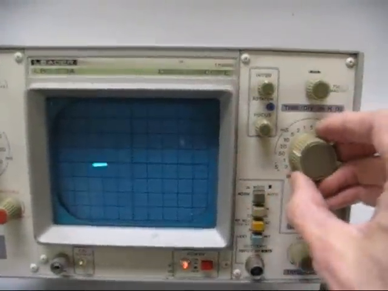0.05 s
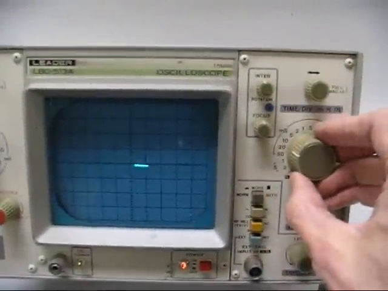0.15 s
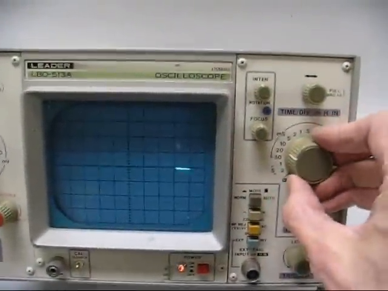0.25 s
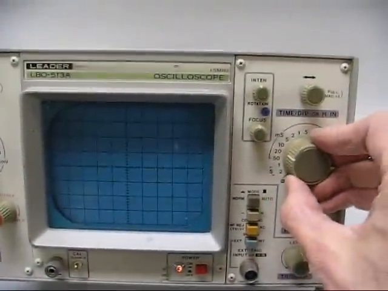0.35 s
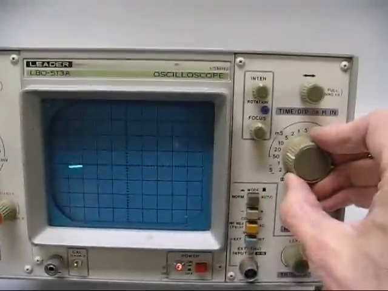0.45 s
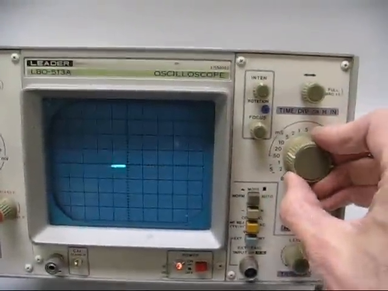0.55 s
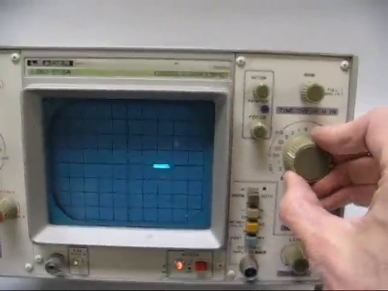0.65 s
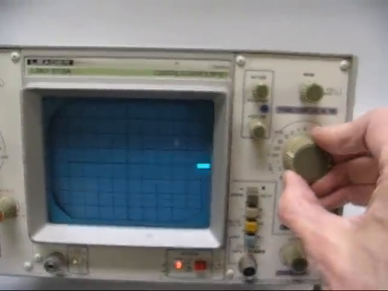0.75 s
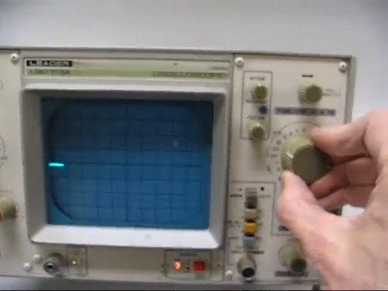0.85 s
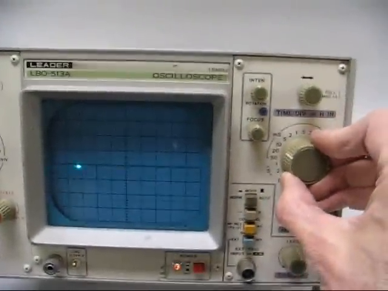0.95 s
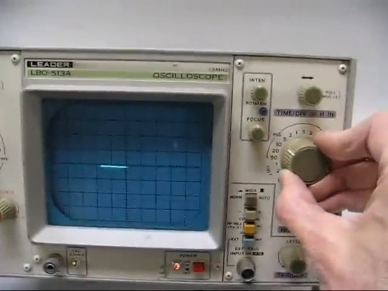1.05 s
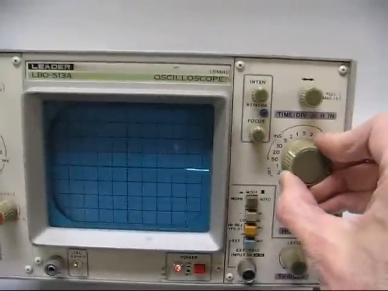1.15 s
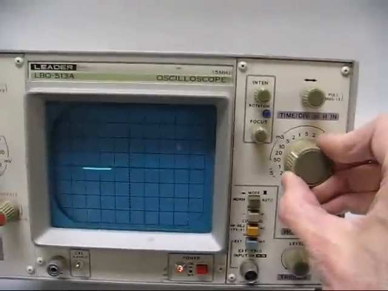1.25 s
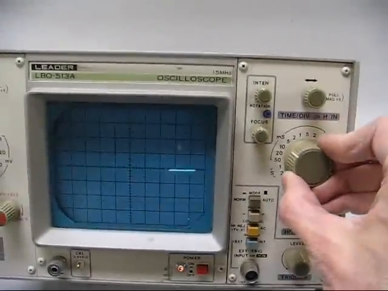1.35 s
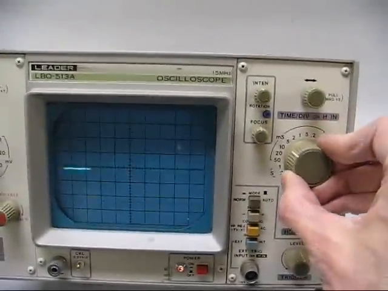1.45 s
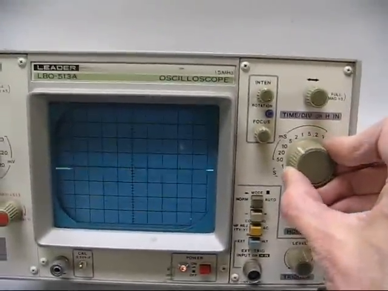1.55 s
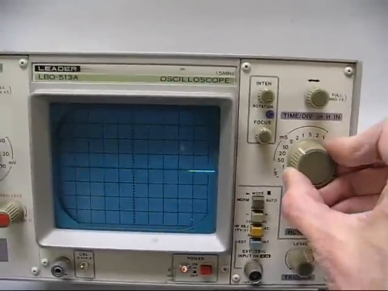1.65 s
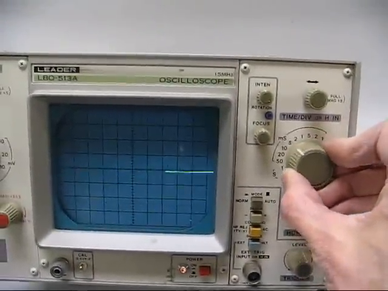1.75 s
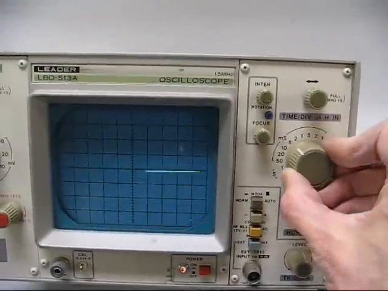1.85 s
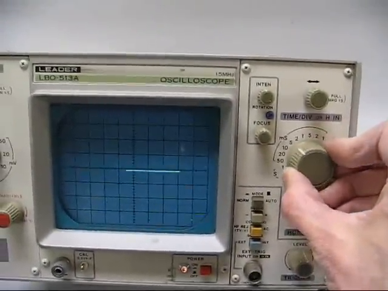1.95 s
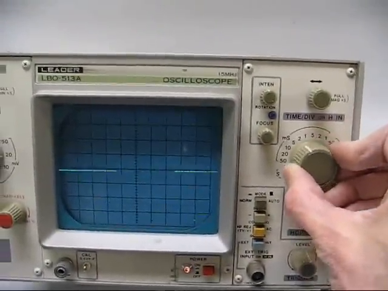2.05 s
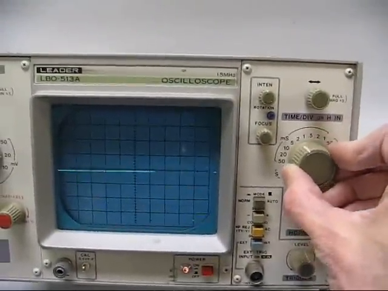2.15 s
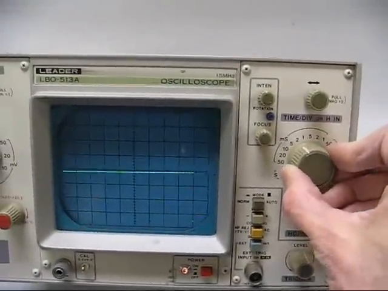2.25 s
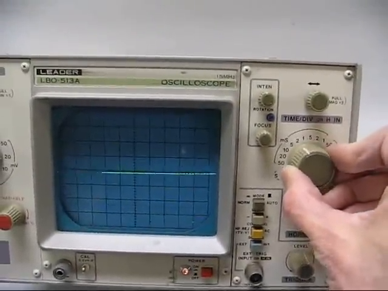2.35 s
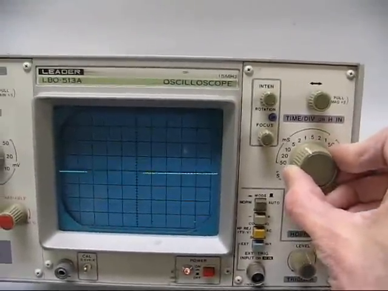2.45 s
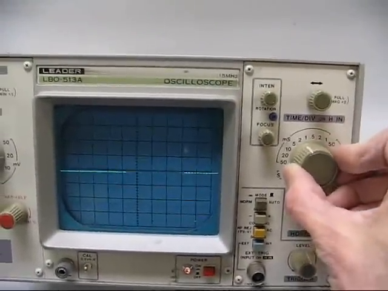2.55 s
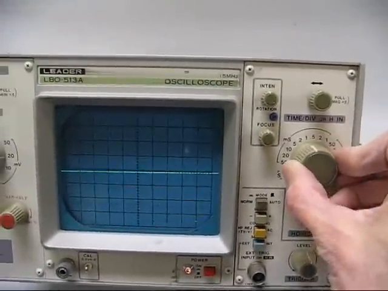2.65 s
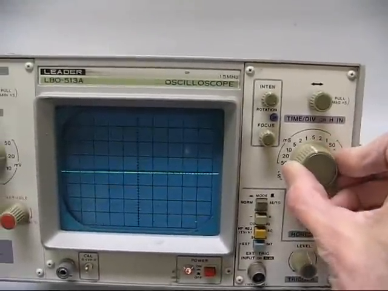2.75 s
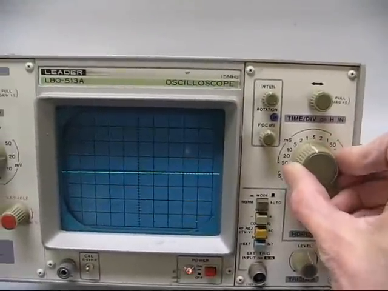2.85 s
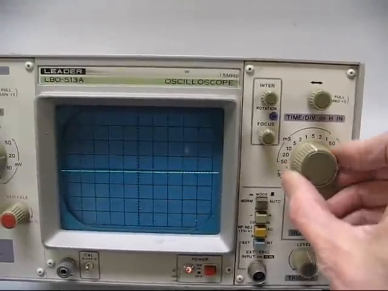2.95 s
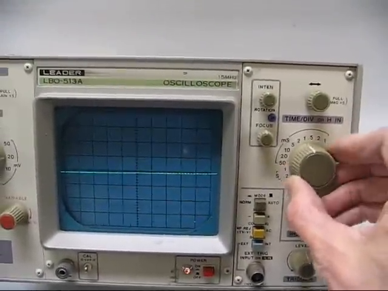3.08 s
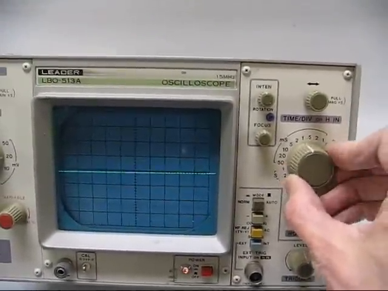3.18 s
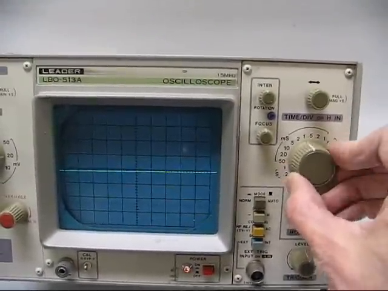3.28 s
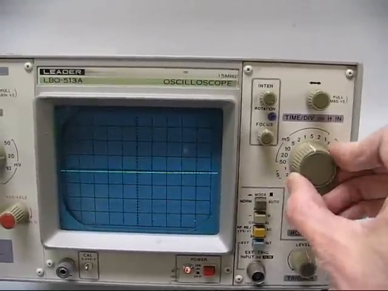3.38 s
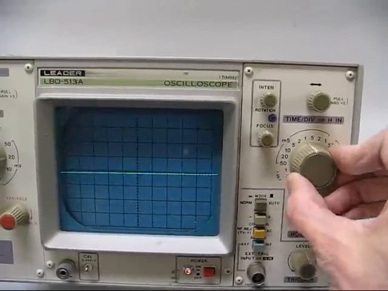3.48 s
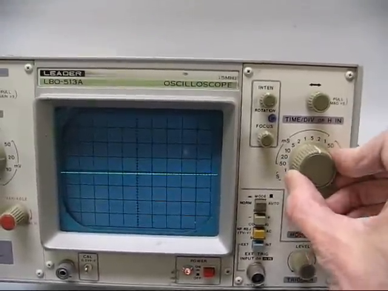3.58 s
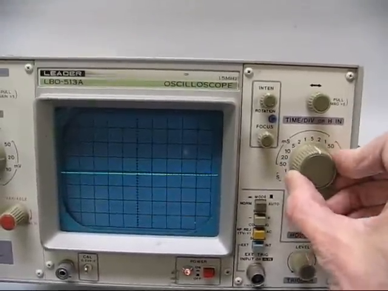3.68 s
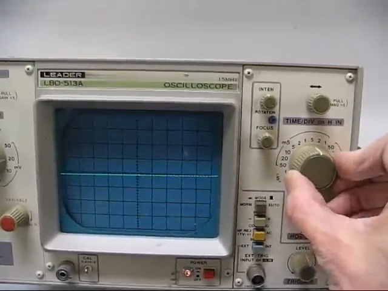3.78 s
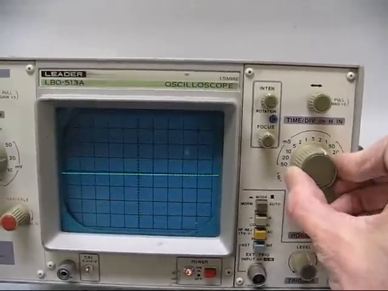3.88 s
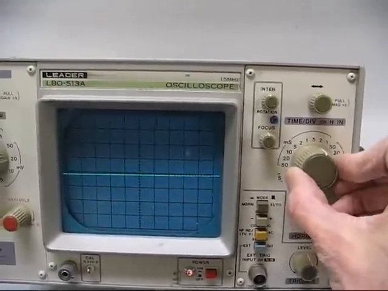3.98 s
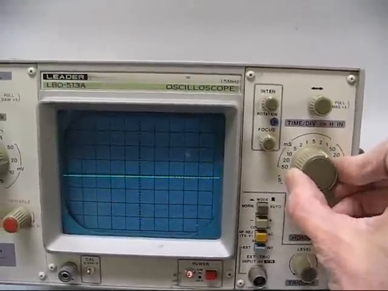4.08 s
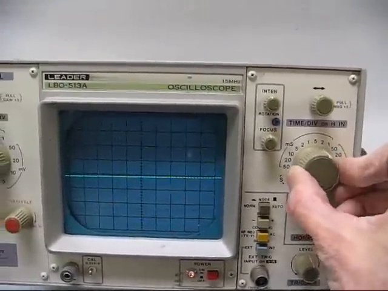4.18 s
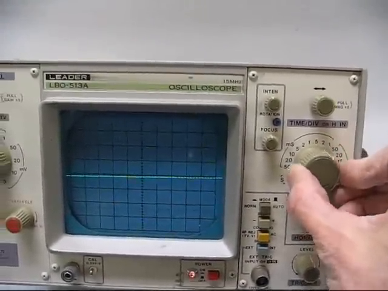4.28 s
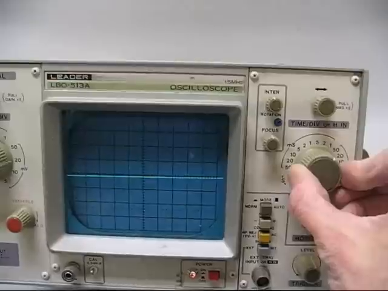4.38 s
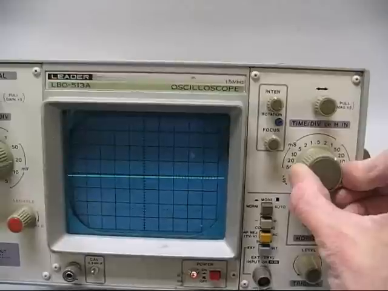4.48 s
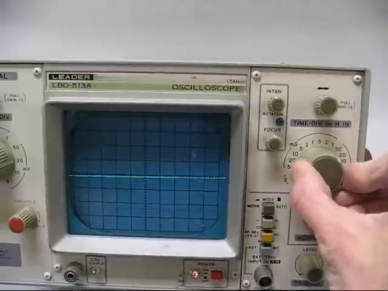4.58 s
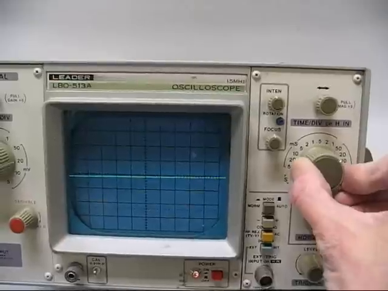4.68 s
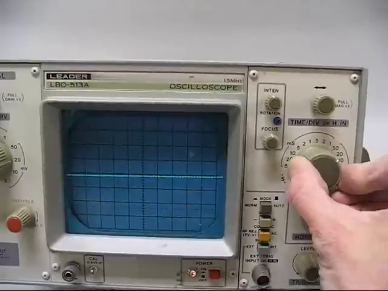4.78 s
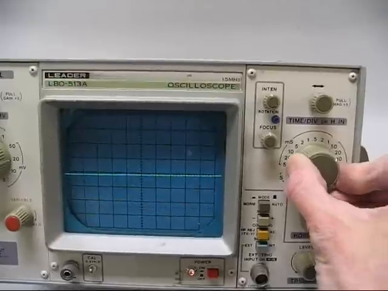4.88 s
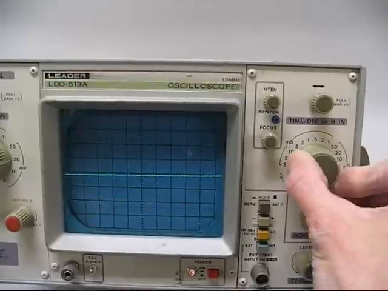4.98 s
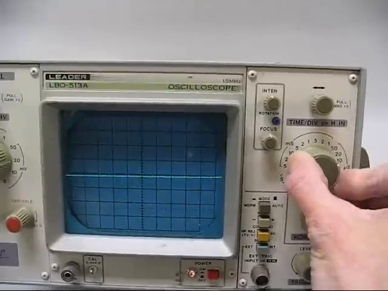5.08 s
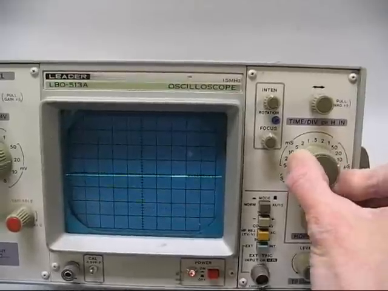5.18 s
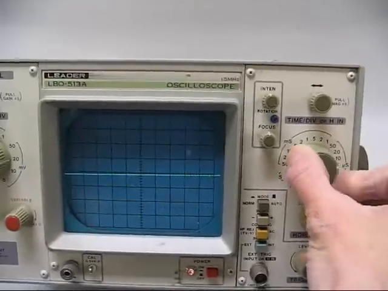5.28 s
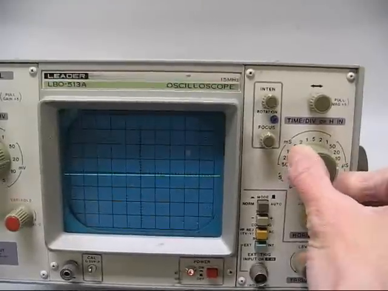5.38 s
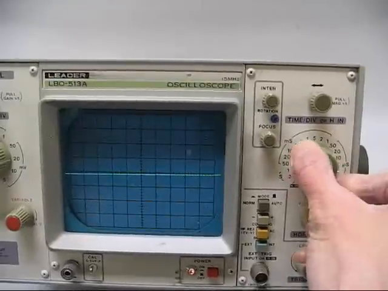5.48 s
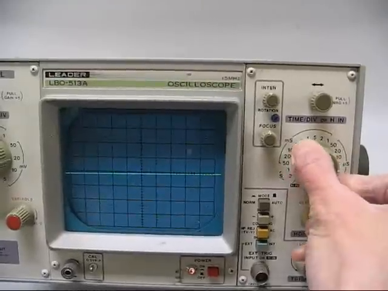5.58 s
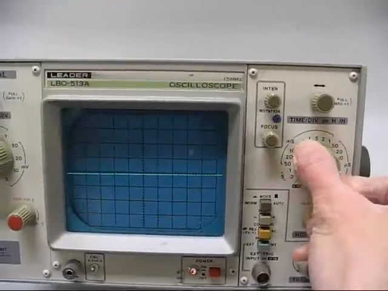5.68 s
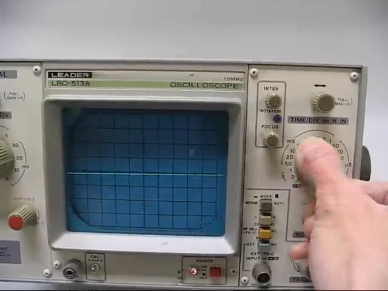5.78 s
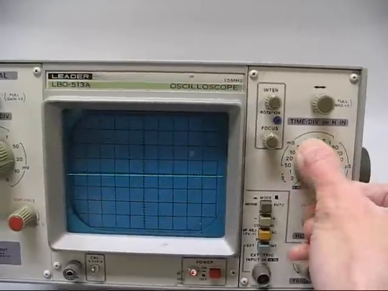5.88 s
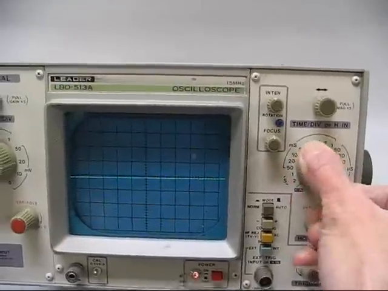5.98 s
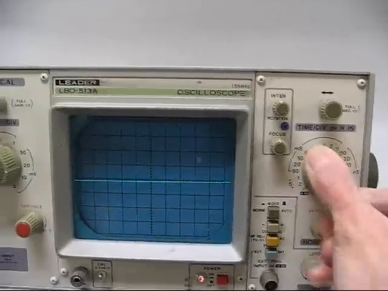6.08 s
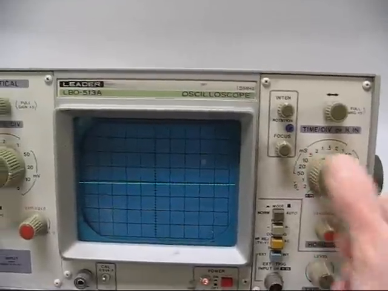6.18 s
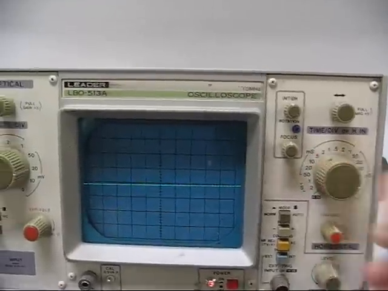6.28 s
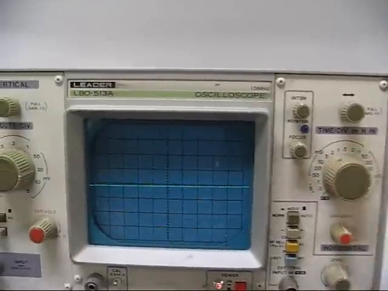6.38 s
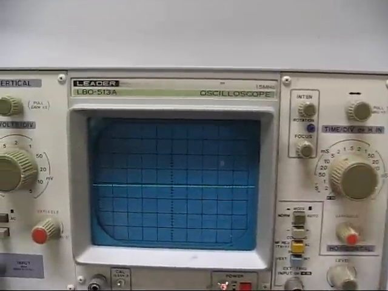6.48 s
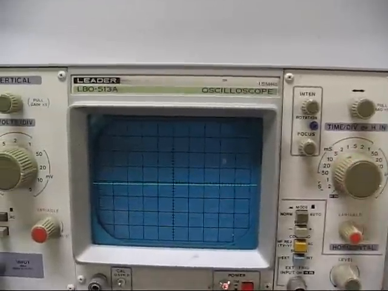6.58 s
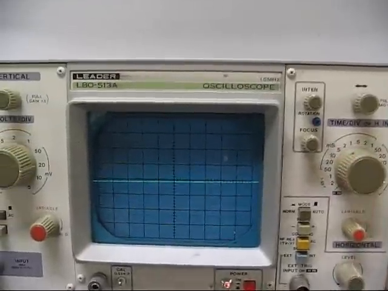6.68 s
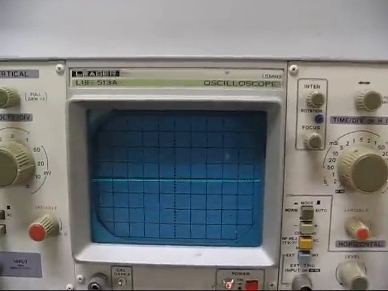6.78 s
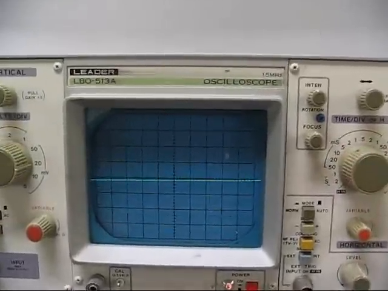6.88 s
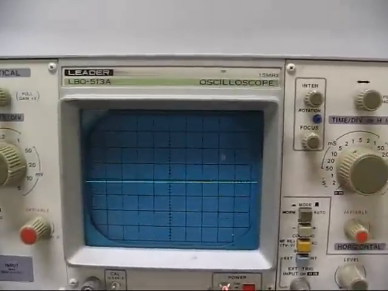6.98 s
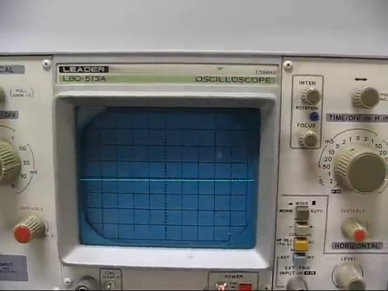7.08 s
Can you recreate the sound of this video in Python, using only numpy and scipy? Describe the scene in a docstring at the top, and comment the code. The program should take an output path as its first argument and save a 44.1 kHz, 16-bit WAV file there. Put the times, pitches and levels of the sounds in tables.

```python
"""A rotary switch on an oscilloscope, turned by hand in a small room over steady hum, airy rush and thin whine.
A faint whir opens the scene and fades at about the first step; a finger brushes the knob just before it.
Twelve detents then snap from 1.1 to 5.8 s, each a noise burst shaped by metal resonances, with a spring ring,
low case ring and room tail; firm landings are bright, soft ones dull. Noise-band brushes fall between them.
A light noise tick follows as the hand lets go; last come a dull filtered knock and one more brush."""
import sys
import numpy as np
from scipy import signal
from scipy.fft import rfft, irfft
from scipy.io import wavfile
from scipy.ndimage import uniform_filter1d

SR = 44100
rng = np.random.default_rng(int(sys.argv[2]) if len(sys.argv) > 2 else 0)


def pcm_store(signal):
    """Save signal as 16-bit PCM."""
    levels = np.round(np.clip(np.atleast_2d(signal), -1, 1) * 32767)
    wavfile.write(sys.argv[1], SR, levels.astype(np.int16).T)


N = 314502  # length in samples
EDGE_HZ = 15550  # upper band limit of the whole scene


# switch steps: (t/s, nominal level/dB before landing colour, firmness 0-1, f/Hz of the soft-landing dip)
STEPS = [(1.129, -25.5, 0.82, 9900), (1.611, -23.5, 1, 11000), (2.1225, -26, 0.71, 11000),
         (2.6964, -28, 0.9, 11000), (3.6083, -26, 0.91, 11000), (3.9111, -25, 0.77, 11000),
         (4.3002, -26.5, .64, 11500), (4.6923, -29.5, 0.13, 7050), (5.0268, -26, .27, 10600),
         (5.326, -27.5, 0.08, 10300), (5.5799, -24, 0.4, 10500), (5.8486, -25.5, 0.94, 11000)]
# early returns of the snap from bench and nearby gear: (delay t/s, level/dB relative to the snap)
BENCH_ECHOES = [(.002, 3.5), (.0047, 3), (.0079, -2.5), (0.01, -2.5), (0.013, -1), (0.0197, -14)]


def switch(snap_t60=0.014, rattle_t60=0.11, rattle_db=-8, tick_db=-14, room_db=-15, case_db=-21):
    """The detent snaps home at each step and rings the same metal, coloured by how the spring lands."""
    t, out = np.arange(SR // 3) / SR, np.zeros(N)
    # power of the snap, a short rattle of the wafers on the shaft, and the early returns
    power = dying(t, snap_t60) ** 2
    power = power + (gain_of(rattle_db) * dying(t, rattle_t60)) ** 2
    for delay, db in BENCH_ECHOES:
        power = power + (gain_of(db) * dying(t - delay, snap_t60)) ** 2
    # countless small modes, shared by all steps, give the same jagged fine colour
    small_modes = scatter(power, count=0)
    for s, db, firmness, dip_hz in STEPS:
        step = snap(power, small_modes) + spring(t)
        step = step + gain_of(tick_db) * contact_tick(t)
        step = step + gain_of(room_db) * room_answer(t)
        step = step + gain_of(case_db) * case_ring(t)
        # unit energy becomes rms over a 32 ms span
        level = gain_of(db) * np.sqrt(0.032 * SR)
        add(out, s, level * coloured(step, landing(firmness, dip_hz)))
    return out


# broad colour of the snap: (f/Hz, relative level/dB per Hz)
SNAP_COLOUR = [(200, -26), (1000, -22.5), (1500, -18.5), (3250, -16), (3560, -2), (4200, -9.5),
               (4900, -17.5), (5800, -16), (6700, -8.5), (8700, -13.5), (10000, -15.5), (11100, -24.5),
               (12800, -16.5), (15400, -14.5)]
# resonances of switch and front panel: (f/Hz, width f/Hz, lift level/dB)
PANEL_MODES = [(1162, 40, 3.8), (1620, 40, 5.4), (1738, 90, 2.7), (1894, 40, 10.5), (2007, 40, 4.6),
               (2077, 60, 8.3), (2336, 40, 5.6), (2573, 40, 7.2), (2772, 40, 3.2), (3057, 60, 5.8),
               (3154, 140, 3.8), (3439, 40, 5.5), (3622, 40, 4.4), (3978, 60, 4.7), (4064, 40, 5.3),
               (4252, 60, 7.5), (4527, 90, 4.5), (4672, 40, 5.6), (5038, 60, 7.1), (5485, 90, 6.4),
               (6314, 60, 8.4), (6524, 60, 4.3), (6616, 40, 6.6), (6782, 90, 6.3), (7466, 40, 6.8),
               (7568, 60, 5.4), (7692, 90, 3.3), (8177, 60, 5.1)]


def snap(power, small_modes):
    """A fresh blow and the shared small modes excite the resonances of switch and panel."""
    blow = scatter(power, count=2) + 0.7 * small_modes
    return unit(coloured(blow, SNAP_COLOUR, PANEL_MODES))


# first hard contact of the spring: (f/Hz, relative level/dB per Hz)
TICK_COLOUR = [(300, -13), (700, -41.5), (1300, -1), (2400, -0.5), (4000, 5.5), (9000, -13), (15000, -41)]


def contact_tick(t, t60=0.0035):
    """The first hard contact is a very short burst of coloured noise."""
    return unit(coloured(scatter(dying(t, t60) ** 2, count=4), TICK_COLOUR))


# ring of the detent spring: (f/Hz, level/dB relative to the snap, decay t60 t/s)
SPRING_MODES = [(3644, -8.5, 0.0098), (4080, -16.5, 0.021)]


def spring(t):
    """The detent spring rings briefly and cleanly, each mode swelling for a moment before it dies."""
    out = np.zeros(len(t))
    for hz, db, t60 in SPRING_MODES:
        ring = np.sin(2 * np.pi * hz * t) * t * dying(t, t60)
        out += gain_of(db) * unit(ring)
    return out


def case_ring(t, hz=335, t60=0.09):
    """The jolt gives the case a soft, low ring that takes a moment to swell; its pitch varies per step."""
    pitch = hz * rng.uniform(0.98, 1.04)
    return unit(np.sin(2 * np.pi * pitch * t) * t * dying(t, t60))


# what the room returns of a snap: (f/Hz, relative level/dB per Hz)
ROOM_RETURN = [(400, -24), (2000, -5.5), (3100, -4.5), (3700, 4), (4400, -2.5), (6000, -16), (7200, -5.5),
               (9000, -12.5), (11000, -19), (14000, -10)]


def room_answer(t):
    """The room answers a snap with a coloured diffuse tail."""
    return unit(coloured(room(t), ROOM_RETURN))


# decay of the room by band: (f/Hz, t60 t/s)
ROOM_DECAY = [(300, 0.52), (2000, 0.14), (4000, 0.17), (8000, 0.24), (15000, 0.18)]


def room(t, build_s=0.02):
    """Diffuse tail of the small room: it builds up quickly, then each band dies at its own speed."""
    hz, when, z = signal.stft(rng.standard_normal(len(t)), SR, nperseg=256)
    fade = gain_of(-60 * when / read(ROOM_DECAY, hz)[:, None])
    tail = signal.istft(z * fade, SR, nperseg=256)[1][:len(t)]
    return unit(tail * (1 - np.exp(-(t / build_s) ** 2)))


# the treble tilts around a pivot; below the start frequency the tilt is held
PIVOT_HZ, TILT_FROM_HZ = 3650, 1840
SOFT_DB_PER_OCTAVE, FIRM_DB_PER_OCTAVE = -2.7, 3.5
DIP_DB, DIP_OCTAVES = 6.5, 0.52  # depth at firmness 0, and half-width


def landing(firmness, dip_hz):
    """Firm landings are brighter; the longer contact of soft ones partly cancels one band (f/Hz, level/dB)."""
    hz = np.geomspace(TILT_FROM_HZ, EDGE_HZ, 40)
    tilt = SOFT_DB_PER_OCTAVE + firmness * (FIRM_DB_PER_OCTAVE - SOFT_DB_PER_OCTAVE)
    dip = DIP_DB * max(1 - firmness, 0) * np.exp(-(np.log2(hz / dip_hz) / DIP_OCTAVES) ** 4)
    return np.column_stack([hz, tilt * np.log2(hz / PIVOT_HZ) - dip])


def cam_slide(lead_s=0.002, slide_db=-22):
    """Just before it drops, the spring scrapes over the crest of the cam: a rising sliver of noise."""
    out, size = np.zeros(N), round(lead_s * SR)
    for s, db, *_ in STEPS:
        scrape = evened(coloured(rng.standard_normal(size), SNAP_COLOUR))
        add(out, s - lead_s, gain_of(db + slide_db) * scrape * np.linspace(0, 1, size))
    return out


# fingers brushing the knob: (t/s, nominal level/dB at the swell's peak, centre f/Hz, time to peak t/s)
FINGER_BRUSHES = [(.995, -53, 2220, .006), (1.195, -35.5, 292, 0.0064), (3.026, -48, 1000, .009),
                  (3.04, -56, 2200, 0.02), (4.664, -40, 170, 0.0056), (5.897, -47.5, 2700, 0.0099),
                  (6.938, -51.5, 950, 0.0063)]


def brushes(width=0.7):
    """Skin brushing the knob makes soft swells of band noise, as wide as a share of their centre."""
    t, out = np.arange(SR // 4) / SR, np.zeros(N)
    for s, db, centre, peak_s in FINGER_BRUSHES:
        swell = t / peak_s * np.exp(1 - t / peak_s)
        add(out, s, gain_of(db) * band(len(t), centre, width * centre) * swell)
    return out


# colour of the handling knock: (f/Hz, relative level/dB per Hz)
KNOCK_COLOUR = [(40, -15), (140, 4), (300, -3), (620, -3), (800, -14), (1200, -41), (3000, -58)]


def knock(s=6.8635, peak_db=-24.5):
    """One dull knock of handling: a single impulse through a bass-heavy filter."""
    out = np.zeros(N)
    thud = coloured(signal.unit_impulse(SR // 4), KNOCK_COLOUR)
    add(out, s, gain_of(peak_db) * thud / abs(thud).max())
    return out


# colour of the letting-go tick: (f/Hz, relative level/dB per Hz)
RELEASE_COLOUR = [(800, -6), (2000, 1), (4000, 0), (5500, -10), (8000, -5), (11000, -15), (15000, -14)]


def release(s=6.0715, db=-42.5, t60=0.083):
    """One light, dry tick of dying noise from the knob as the hand lets go."""
    t, out = np.arange(SR // 4) / SR, np.zeros(N)
    noise = evened(coloured(rng.standard_normal(len(t)), RELEASE_COLOUR))
    add(out, s, gain_of(db) * noise * dying(t, t60))
    return out


# broad colour of the air noise: (f/Hz, relative level/dB per Hz)
AIR_COLOUR = [(20, 4), (36, 2.5), (60, -2.5), (90, -9), (125, -10), (160, -18.5), (230, -9.5), (420, -15.5),
              (800, -20.5), (2100, -24), (2700, -26.5), (8000, -34.5), (11000, -39), (14000, -37.5)]
# resonances of case and room in the air noise: (f/Hz, width f/Hz, lift level/dB)
AIR_MODES = [(241.6, 22.5, 7.5), (291, 12.2, 10), (329, 70, 3.5), (507, 91, 8), (590.6, 52, 10),
             (670, 128, 5.5), (1147, 30, 6.5), (1781, 89, 8), (2320, 86, 5), (4246, 96, 6.5),
             (4690, 200, 4)]


def air(db=-45):
    """Steady rush of moving air, lifted at the resonances of case and room."""
    hz = np.fft.rfftfreq(N, 1 / SR)
    colour = gain_of(read(AIR_COLOUR, hz) + lifts(AIR_MODES, hz))
    low_cut = hz / (hz + 10)
    rush = irfft(rfft(rng.standard_normal(N)) * colour * low_cut, N)
    return gain_of(db) * evened(rush)


# motor and mains tones: (mean f/Hz, nominal rms level/dB)
HUM_TONES = [(18.4, -41), (36.6, -55), (55, -61.5), (120, -64), (219, -70.5), (290.7, -56), (299.7, -55),
             (363, -66.5), (597.5, -63), (1785, -72.5)]


def hum(wander_hz=0.528, waver_db=1.36):
    """Motor and mains tones, each a sine wavering slightly in pitch and level."""
    t, out = np.arange(N) / SR, np.zeros(N)
    for hz, db in HUM_TONES:
        level = gain_of(db + waver_db * drift(4.2))
        # the summed pitch drift, in cycles
        wander = wander_hz * np.cumsum(drift(2.0)) / SR
        out += level * np.sin(2 * np.pi * (hz * t + wander + rng.random()))
    return np.sqrt(2) * out  # sine peak from rms


# whine of the electronics: (f/Hz, rms level/dB)
WHINE_TONES = [(8102, -67), (13948, -70.5)]


def whine():
    """The electronics whine thinly on steady high sines."""
    t = np.arange(N) / SR
    return np.sqrt(2) * sum(gain_of(db) * np.sin(2 * np.pi * hz * t) for hz, db in WHINE_TONES)


def whir(hz=4800, width_hz=250, db=-68, until_s=1.3):
    """A faint, narrow noise band that fades at about the first step."""
    fade = np.clip((until_s - np.arange(N) / SR) / 0.2, 0, 1)
    return gain_of(db) * band(N, hz, width_hz) * fade


def gain_of(db):
    """Decibels to an amplitude factor."""
    return 10 ** (np.asarray(db) / 20)


def evened(x):
    """Scales to rms 1."""
    return x / np.sqrt(np.mean(x ** 2) + 1e-20)


def unit(x):
    """Scales to energy 1."""
    return x / np.linalg.norm(x)


def read(points, hz):
    """Reads a table along a log-frequency axis, holding its end values."""
    f, value = np.transpose(points)
    return np.interp(np.log(hz + 1), np.log(f + 1), value)


def add(mix, s, sound):
    """Mixes a sound in at time s, cut at the end of the mix."""
    part = mix[round(s * SR):][:len(sound)]
    part += sound[:len(part)]


def lifts(peaks, hz):
    """The dB that a set of resonances adds at each frequency."""
    return sum(lift / (1 + (2 * (hz - f) / width) ** 4) for f, width, lift in peaks)


def coloured(x, points, peaks=(), size=8192):
    """Causal filter from a level curve and resonances: sharp attack, ringing afterwards."""
    hz = abs(np.fft.fftfreq(size, 1 / SR))
    log_gain = np.log(gain_of(read(points, hz) + lifts(peaks, hz)))
    # minimum phase packs the energy as early as possible
    taps = np.fft.ifft(np.exp(signal.hilbert(log_gain).conj())).real
    return signal.fftconvolve(x, taps[:size // 2])[:len(x)]


def dying(t, t60):
    """Amplitude that starts at t = 0 and falls 60 dB in t60."""
    return (t >= 0) * np.exp(-np.log(1000) * np.maximum(t, 0) / t60)


def scatter(power, count=10, size=31):
    """One blow spread over many close modes, its power following a curve."""
    burst = rng.standard_normal(len(power)) * np.sqrt(power)
    for _ in range(count):
        # flatten the spectrum, then restore the power curve
        burst = irfft(np.exp(1j * np.angle(rfft(burst))), len(power))
        burst *= np.sqrt(power / (abs(uniform_filter1d(burst ** 2, size)) + 1e-14))
    return unit(burst)


def band(size, hz, width):
    """Noise of rms 1 in one soft resonance."""
    f = np.fft.rfftfreq(size, 1 / SR)
    resonance = 1 / (1 + (2 * (f - hz) / width) ** 2)
    return evened(irfft(rfft(rng.standard_normal(size)) * resonance, size))


def drift(hz):
    """Slow random motion of rms 1, smoothed to changes of up to about hz times a second."""
    smoothing = np.exp(-(np.fft.rfftfreq(N, 1 / SR) / hz) ** 2)
    return evened(irfft(rfft(rng.standard_normal(N)) * smoothing, N))


def scene():
    """Switch and hand over the steady background."""
    hand = cam_slide() + brushes() + knock() + release()
    background = air() + hum() + whine() + whir()
    return (switch() + hand + background)[None]


def record(dry):
    """A steep low-pass limits the treble of the whole scene."""
    taps = signal.firwin(255, EDGE_HZ, window=("kaiser", 8), fs=SR)
    return signal.oaconvolve(dry, taps[None], "same")


dry = scene()
out = record(dry)
pcm_store(out)
```